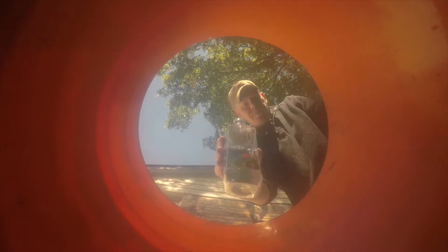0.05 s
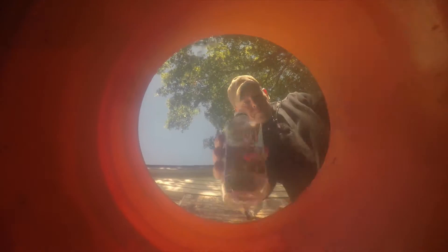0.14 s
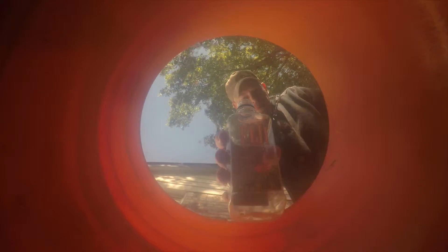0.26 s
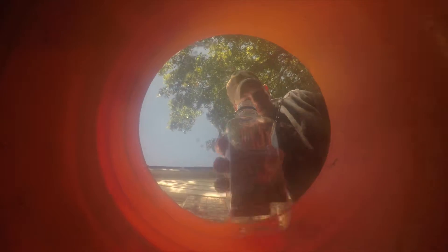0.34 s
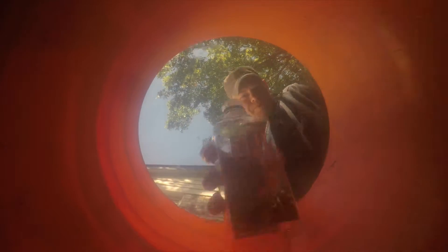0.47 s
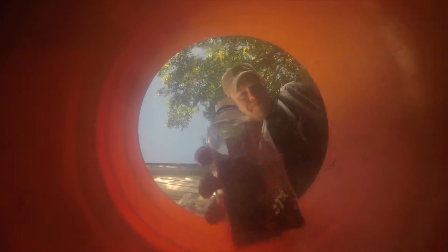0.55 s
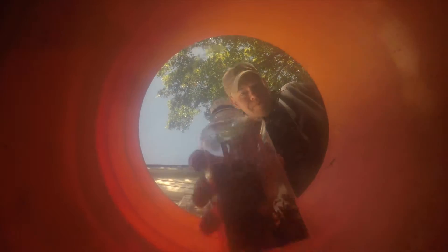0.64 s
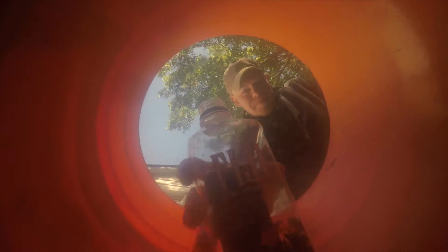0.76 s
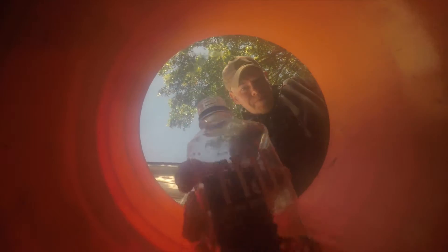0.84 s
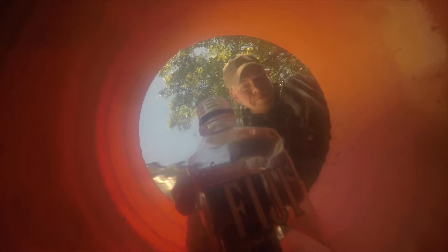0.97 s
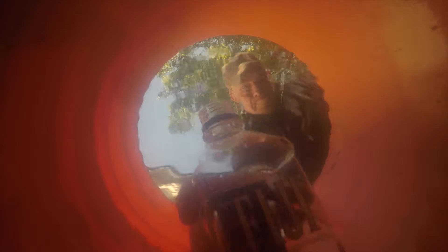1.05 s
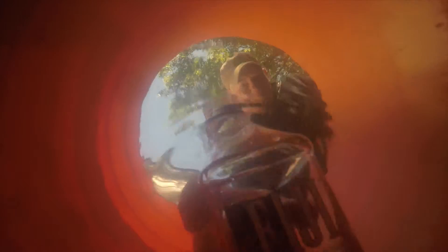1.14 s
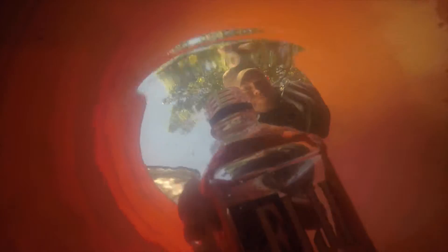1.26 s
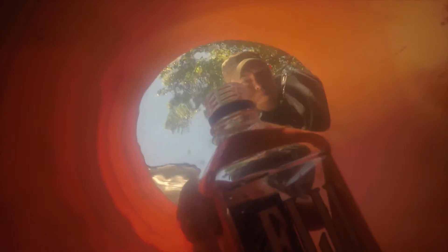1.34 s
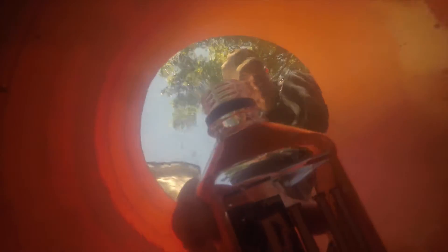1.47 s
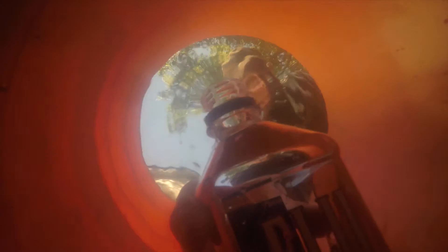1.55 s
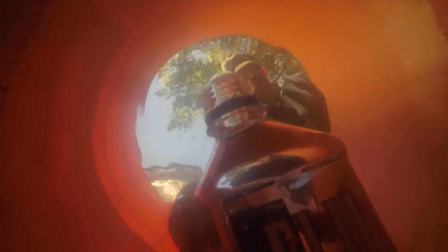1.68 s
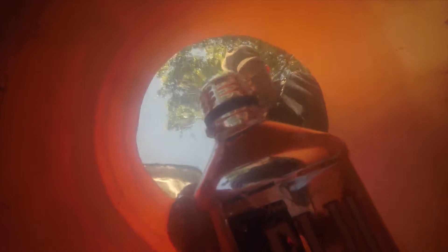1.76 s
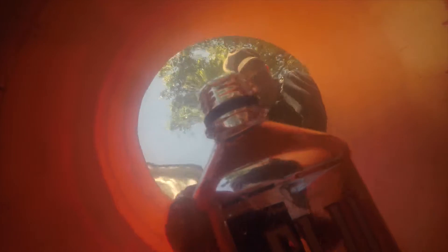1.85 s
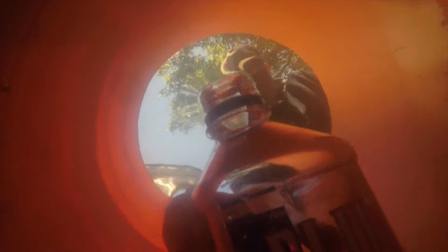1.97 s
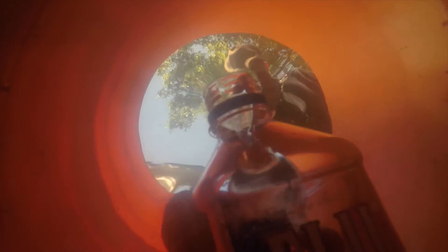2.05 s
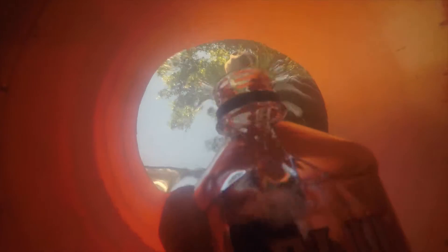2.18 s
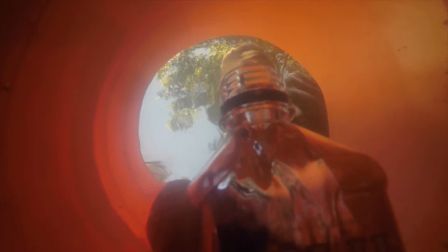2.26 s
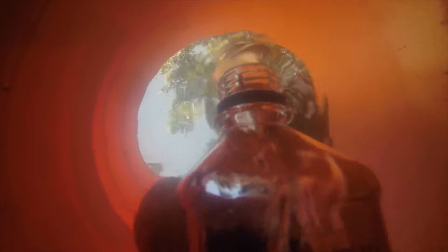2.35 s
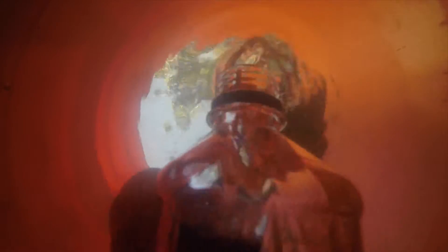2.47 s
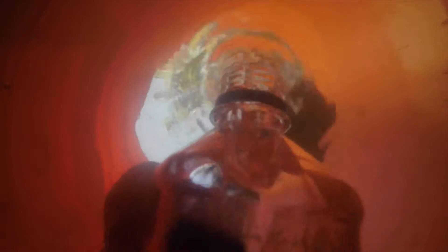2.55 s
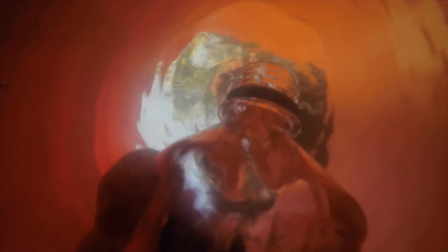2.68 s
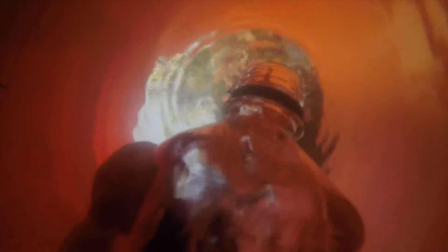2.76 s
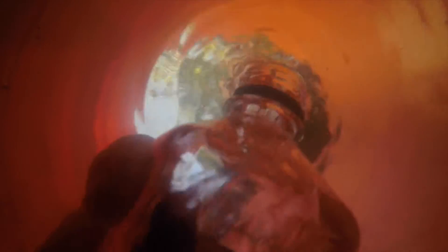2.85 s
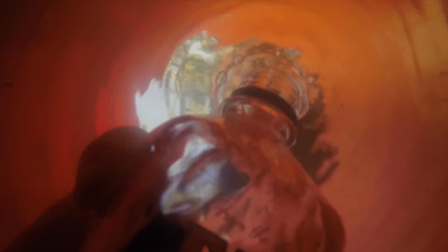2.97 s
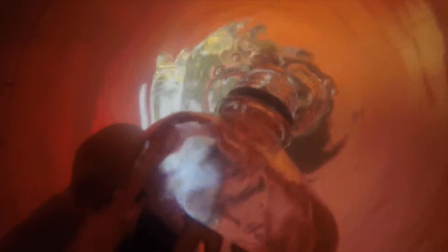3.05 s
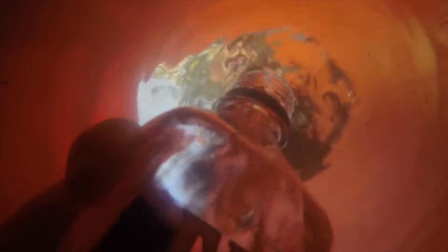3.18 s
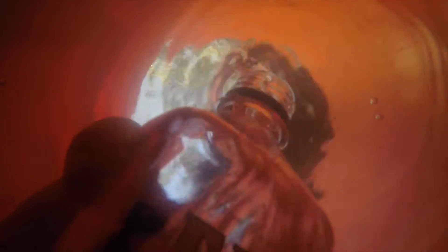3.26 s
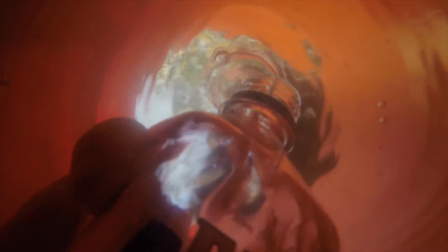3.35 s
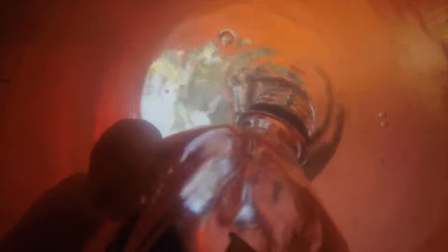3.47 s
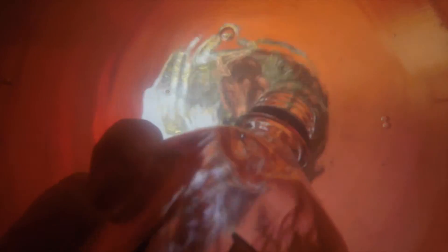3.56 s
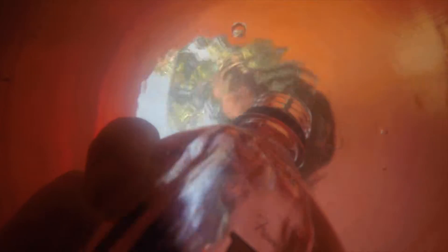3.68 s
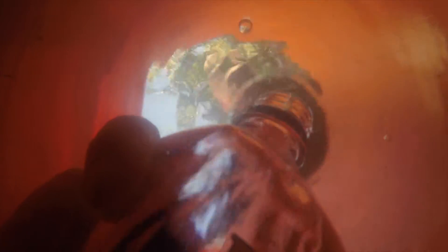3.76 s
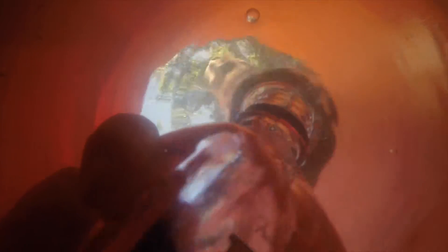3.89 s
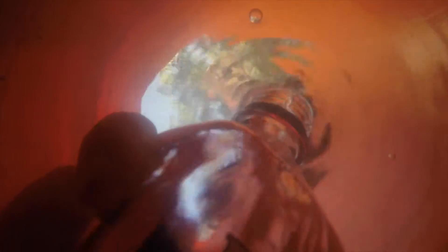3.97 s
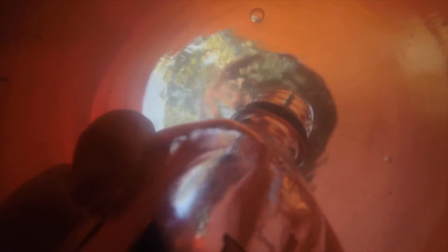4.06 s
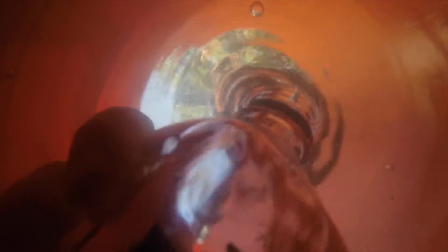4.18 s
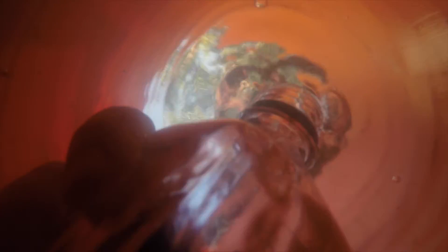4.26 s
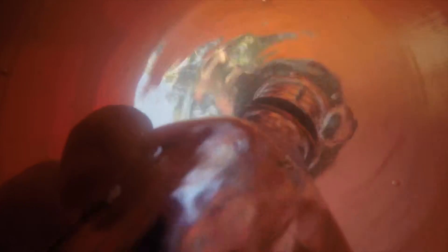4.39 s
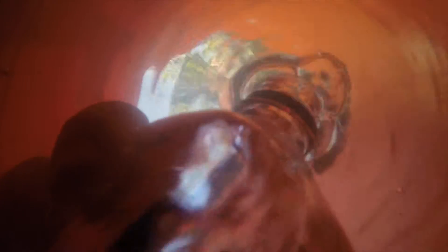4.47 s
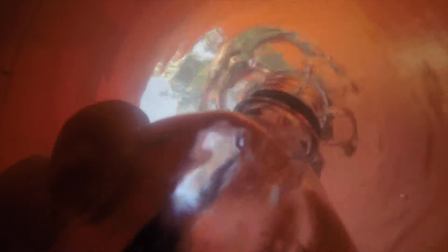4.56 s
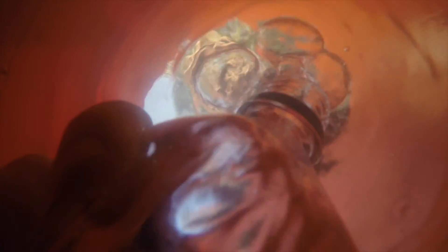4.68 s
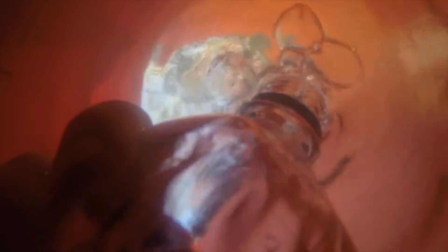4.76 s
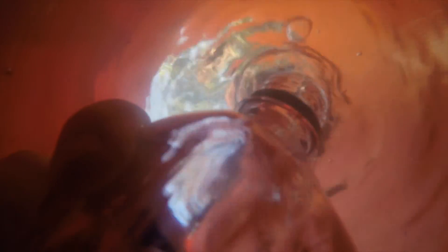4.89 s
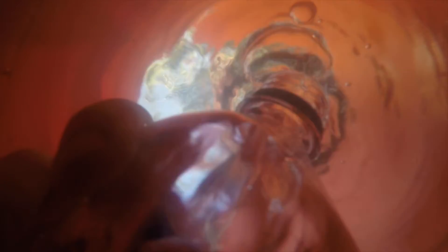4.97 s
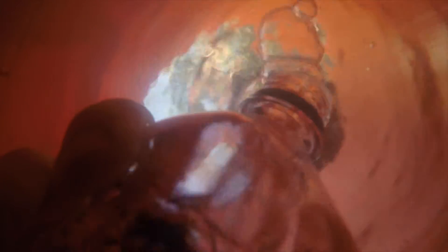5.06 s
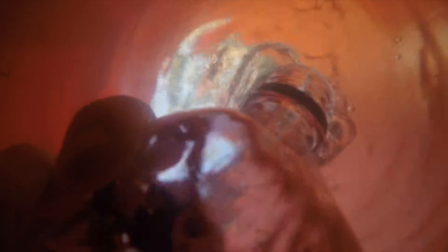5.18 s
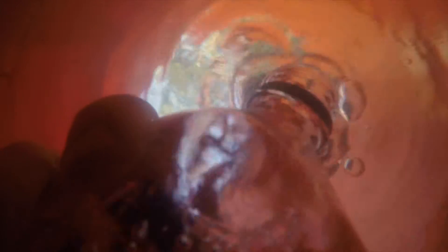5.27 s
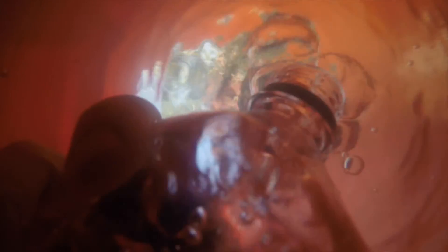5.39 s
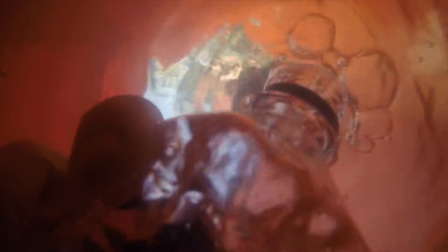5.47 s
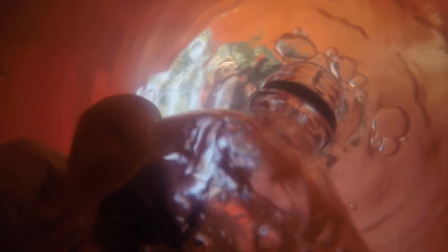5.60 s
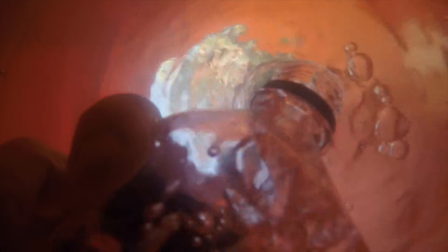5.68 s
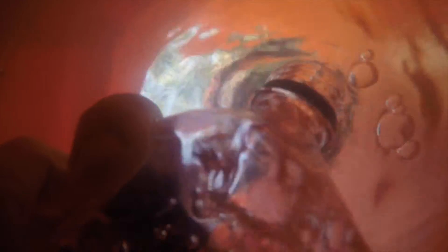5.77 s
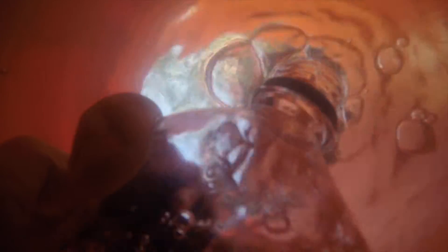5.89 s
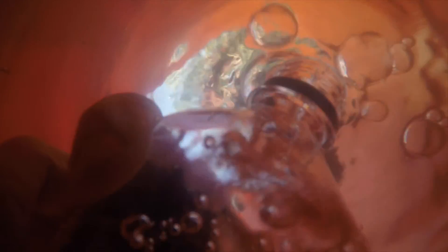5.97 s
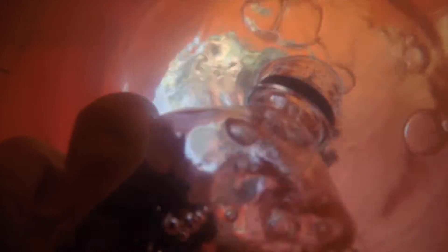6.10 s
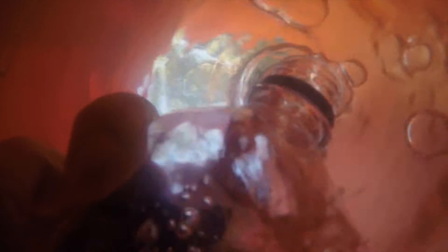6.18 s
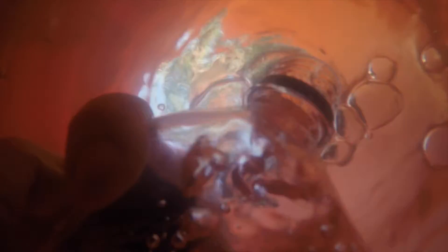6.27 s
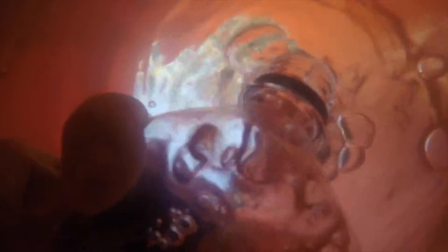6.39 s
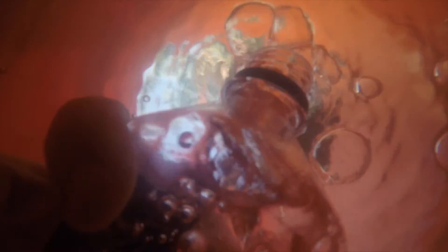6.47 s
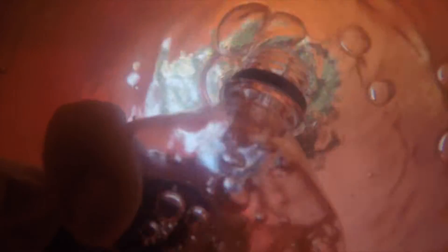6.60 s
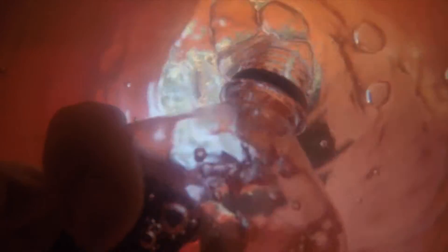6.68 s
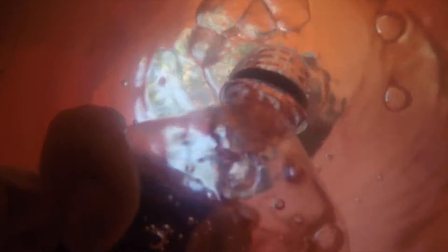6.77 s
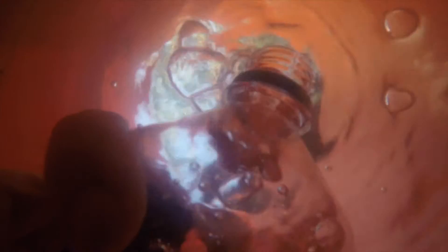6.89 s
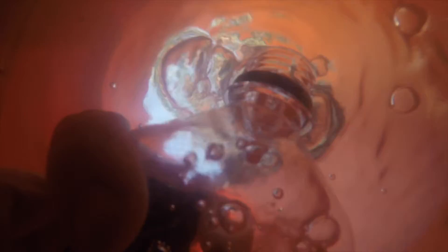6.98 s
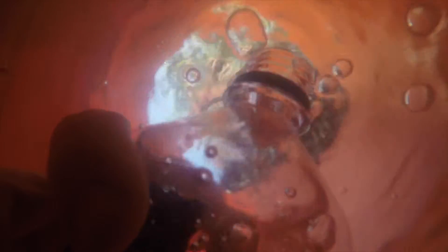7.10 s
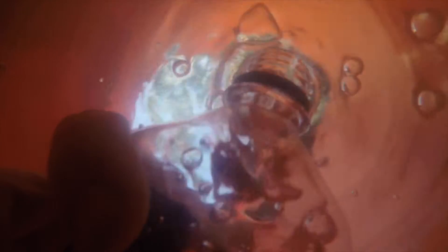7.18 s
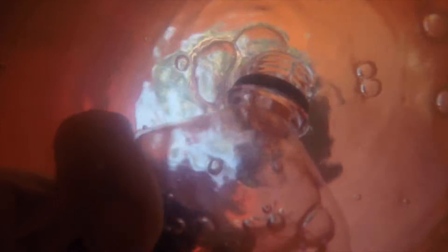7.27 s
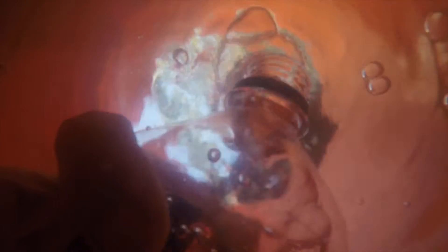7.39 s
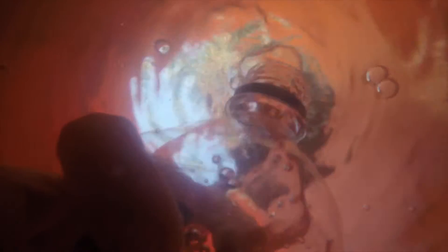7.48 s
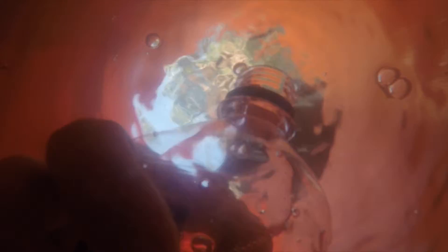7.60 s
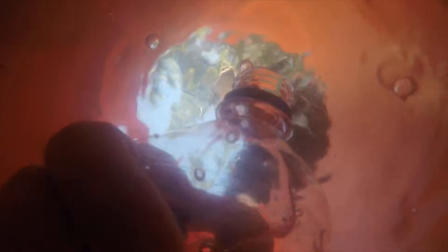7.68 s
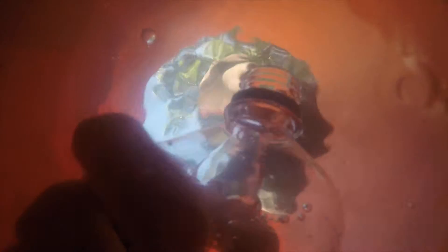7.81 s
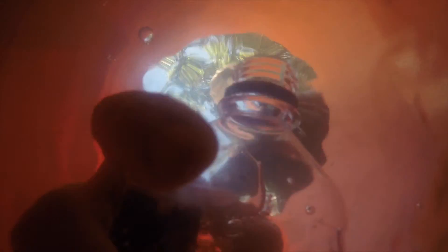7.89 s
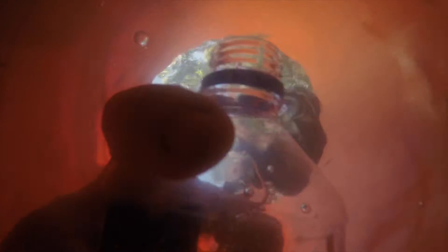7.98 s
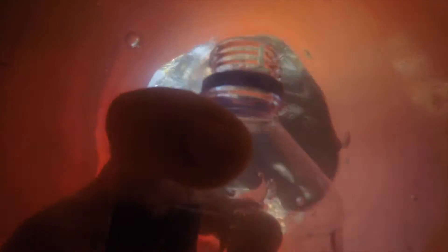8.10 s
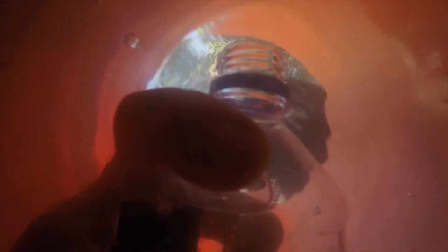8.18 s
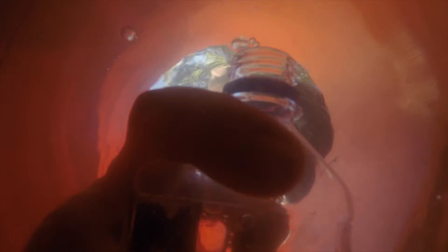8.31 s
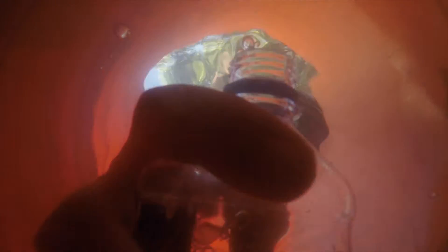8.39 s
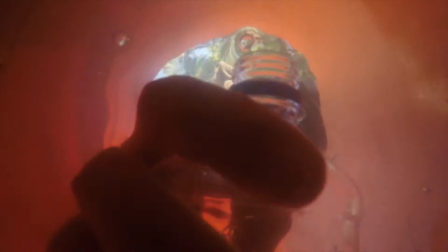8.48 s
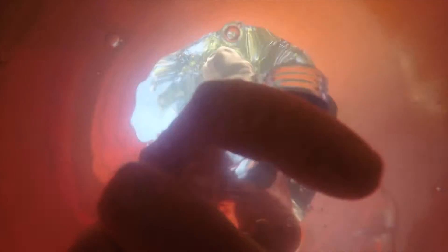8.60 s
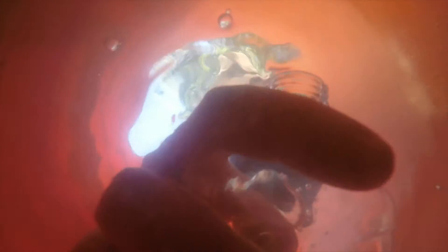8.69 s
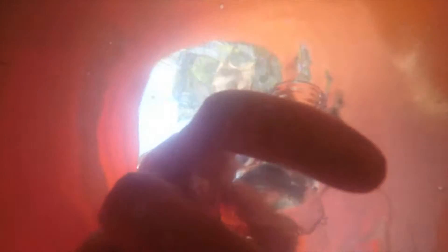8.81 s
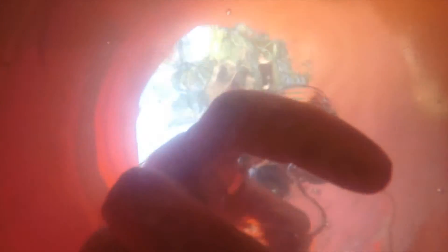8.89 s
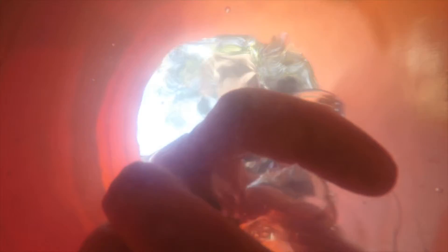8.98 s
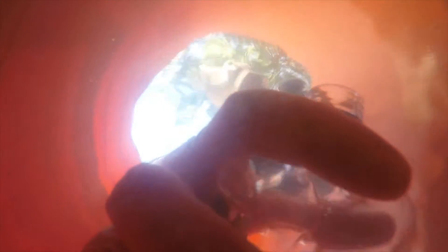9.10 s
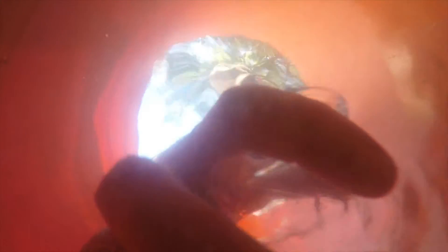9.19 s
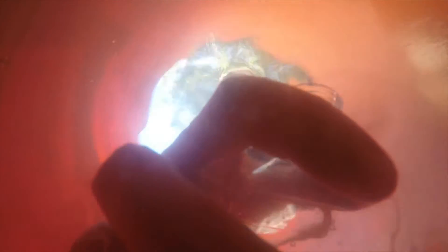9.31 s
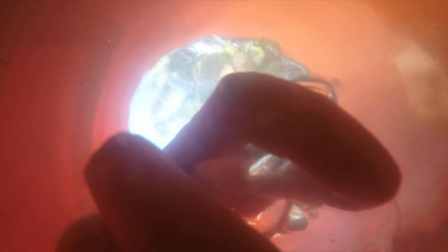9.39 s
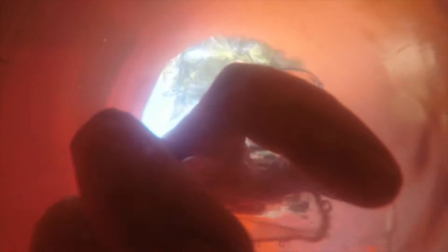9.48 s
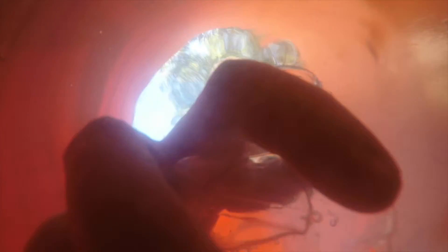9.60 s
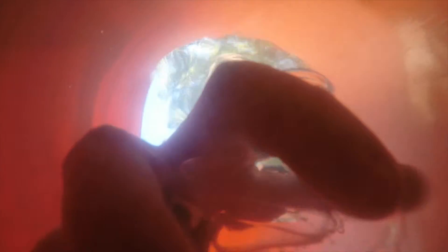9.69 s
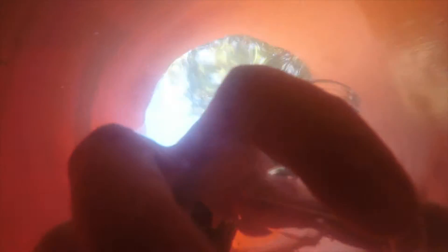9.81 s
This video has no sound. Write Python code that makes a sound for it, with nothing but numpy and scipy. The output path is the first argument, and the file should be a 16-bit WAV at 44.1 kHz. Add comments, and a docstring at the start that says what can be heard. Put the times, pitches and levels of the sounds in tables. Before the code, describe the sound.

Heard close and underwater: dull distant waves, a short cluster of bottle taps on plastic, and a little hiss. Then continuous irregular booming gulps of air leave the bottle neck, crowded with bright pops, rising plops, fine ticks and fizz. After about seven seconds the gulping stops; water sloshes low, hisses briefly, and the bottle thumps the bucket wall several times, hardest near nine seconds.

```python
"""Muffled surf comes first, heard through bucket and water: shaped noise with two faint steady tones.
A bottle then taps the wall of the water-filled bucket, rocks it and stirs the water: ringing modes and swells.
Pushed under, it glugs: short booms, with bubble pings, plops, fizz, fine ticks and hissing rushes of water.
Near the end the bottle knocks on the wall again. Bubbles and hiss also ring the plastic case round the
microphone, which lies on the bottom; the loudest peaks are softly overloaded."""
import sys
import numpy as np
from scipy import signal
from scipy.io import wavfile
from scipy.ndimage import uniform_filter1d

SR = 44100
rng = np.random.default_rng(int(sys.argv[2]) if len(sys.argv) > 2 else 0)


def store_wav(level_fs):
    """Save 16-bit WAV to argv[1]."""
    pcm = np.round(np.clip(np.atleast_2d(level_fs), -1, 1) * 32767)
    wavfile.write(sys.argv[1], SR, pcm.T.astype(np.int16))


N = 434385
TOP_HZ = SR / 2 - 2000  # highest starting pitch allowed for twin bubbles and ticks, and for snap bands

# Gulps of air leaving the bottle neck: start_s, level_db [dB], pitch_hz [Hz]
GULPS = [(2.308, -4.5, 84.5), (2.379, -12.5, 95.2), (2.454, -15, 82.3), (2.541, -10, 88.6),
         (2.592, -14, 84), (2.726, -12.5, 86), (2.82, -13.5, 89.4), (2.919, -14.5, 83.7), (2.968, -16, 92),
         (3.104, -10, 80), (3.158, -12, 92), (3.252, -14.5, 92.6), (3.348, -13, 85), (3.61, -8, 79.9),
         (3.668, -6, 86.6), (3.879, -16, 86.4), (3.963, -10.5, 83.9), (4.008, -10.5, 92.4),
         (4.225, -9, 83.2), (4.319, -13.5, 88), (4.431, -13.5, 79), (4.57, -10.5, 88), (4.641, -8.5, 79.5),
         (4.74, -10.5, 84.3), (4.896, -9.5, 85.9), (5.013, -12.5, 92), (5.121, -7.5, 86.3),
         (5.269, -12.5, 83.8), (5.351, -13, 85), (5.429, -12, 85.3), (5.536, -10.5, 82.5), (5.58, -9, 86),
         (5.733, -14, 80.8), (5.82, -12, 66.4), (5.955, -14.5, 66.5), (6.015, -16, 87), (6.14, -11, 92.5),
         (6.356, -11.5, 91.8), (6.387, -18, 83.7), (6.451, -9.5, 81), (6.542, -11.5, 82),
         (6.588, -24, 82.4), (6.756, -11, 84.2), (6.882, -14, 79.4), (6.973, -16, 78), (7.14, -21, 92.3),
         (7.323, -21.5, 98.6)]
FILL_START_S, FILL_STOP_S = GULPS[0][0], GULPS[-1][0]  # the bottle fills from first to last gulp


def gain_of(db):
    """Turns decibels into amplitude."""
    return 10 ** (np.asarray(db) / 20)


def evened(x):
    """Scales a signal to an rms (average strength) of 1."""
    return x / np.sqrt(np.mean(x ** 2) + 1e-20)


def along(rows, axis=1):
    """Draws straight lines between the points of one table column, giving a value at every sample."""
    rows = np.array(rows)
    return np.interp(np.arange(N) / SR, rows[:, 0], rows[:, axis])


def add(mix, start_s, sound):
    """Mixes a sound in at a time, cutting off what runs past the end."""
    part = mix[round(start_s * SR):][:len(sound)]
    part += sound[:len(part)]


def band_noise(low_hz, high_hz, rows, length):
    """Rows of random noise filtered to one band of pitches."""
    band = signal.butter(2, [low_hz, high_hz], "band", fs=SR)
    return signal.lfilter(*band, rng.standard_normal((rows, length)))


def noise(shape, patchy_db, flicker_db, size=1024):
    """Noise from random short-time spectra, with drifting patches and a flicker shared by all pitches."""
    frames, hz = 4 * N // size + 5, np.fft.rfftfreq(size, 1 / SR)
    real, imaginary, patches = rng.standard_normal((frames, len(hz), 3)).T
    patches = uniform_filter1d(patches, size=9, axis=0)
    patches = evened(uniform_filter1d(patches, size=9, axis=1))
    flicker = evened(uniform_filter1d(rng.standard_normal(frames), size=3))
    shape_hz, shape_db = np.transpose(shape)
    level_db = np.interp(np.log(hz + 1), np.log(shape_hz + 1), shape_db)[:, None]
    level_db = level_db + patchy_db * patches + flicker_db * flicker
    spectra = (real + 1j * imaginary) * gain_of(level_db)
    sound = signal.istft(spectra, nperseg=size, noverlap=3 * size // 4)[1]
    return evened(sound[:N])


def resonate(x, modes):
    """Sum of steep resonances, each a one-pole filter applied twice."""
    out = np.zeros(len(x))
    for hz, width_hz, db in modes:
        pole = np.exp((2j * hz - width_hz) * np.pi / SR)
        twice = np.convolve([1, -pole], [1, -pole])
        out += gain_of(db) * evened(signal.lfilter([1], twice, x).real)
    return evened(out)


def ring(hz, t60_s, rise_s, glide=0.):
    """A soft-starting sine that dies by 60 dB in t60_s, its pitch climbing by the share glide in that time."""
    t = np.arange(int(t60_s * SR) + 8) / SR
    shape = gain_of(-60 * t / t60_s) * (1 - np.exp(-t / rise_s))
    return shape / shape.max() * np.sin(2 * np.pi * hz * t * (1 + glide * t / t60_s / 2))


def surf():
    """Wave noise dulled by wall and water, plus faint steady tones from electronics."""
    # Spectrum of the muffled waves: pitch_hz [Hz], level_db [dB per Hz, relative]
    surf_spectrum = [(12, -29), (22, 9.5), (45, -18), (75, 2.5), (115, -15.5), (150, -7), (235, -16.5),
                     (300, -8), (430, -28.5), (700, -23.5), (796, -17), (1200, -30), (1510, -28.5),
                     (2600, -39), (3000, -43), (14500, -58.5)]
    # Loudness of the surf over time: time_s, level_db [dB]
    surf_level = [(0, -41), (1.06, -40), (1.3, -36), (2.2, -38), (3.3, -39), (7.5, -40.5), (9.85, -39)]
    # Tones from electronics: pitch_hz [Hz], level_db [dB rms]
    whine = [(7350, -84.5), (14700, -94)]
    t = np.arange(N) / SR
    tones = sum(gain_of(db) * np.sqrt(2) * np.sin(2 * np.pi * hz * t) for hz, db in whine)
    waves = noise(surf_spectrum, patchy_db=1.2, flicker_db=.2, size=8192)
    return gain_of(along(surf_level)) * waves + tones


def rocking(rest_hz=21.75):
    """The full bucket rocks on its base: a nearly pure, very low swing whose pitch drifts a little."""
    # Strength of the rocking over time: time_s, level_db [dB rms]
    rocking_level = [(1.07, -36.5), (2.03, -31.5), (2.1, -48), (2.54, -24.5), (3.76, -21.5), (4.18, -15.5),
                     (4.3, -21), (4.4, -18), (5.28, -22), (5.91, -16.5), (6.72, -21.5), (7.21, -13.5),
                     (8.06, -18), (8.38, -35.5), (8.53, -18.5), (8.92, -29), (9.07, -21), (9.85, -18)]
    fade_in = np.clip((np.arange(N) / SR - rocking_level[0][0]) / .02, 0, 1)
    drift = evened(uniform_filter1d(rng.standard_normal(N), size=12000))
    hz = rest_hz * (1 + 0.0387 * drift)
    swing = np.sqrt(2) * np.sin(2 * np.pi * np.cumsum(hz) / SR)
    return fade_in * gain_of(along(rocking_level)) * swing


def stirring():
    """Hand and bottle shove the water unevenly, exciting low resonances of bucket and water."""
    # Strength of the stirring over time: time_s, slosh_db [dB], gurgle_db [dB]
    stir_level = [(1.075, -39, -53), (1.33, -32.5, -51), (2.14, -37.5, -43), (2.5, -19.5, -46),
                  (4.32, -24, -49), (5.79, -22.5, -41.5), (6.91, -24, -43), (7.45, -30, -54.5),
                  (7.6, -44, -58.5), (8.06, -25.5, -45.5), (8.5, -29, -60), (8.7, -34.5, -36),
                  (8.88, -35.5, -56), (9.3, -30, -44.5), (9.6, -56, -46.5), (9.85, -28.5, -56)]
    # Lower resonances: pitch_hz [Hz], width_hz [Hz], level_db [dB, relative]
    slosh_modes = [(31, 8.2, -10.5), (48.44, 22, 0), (63.1, 14, -2.5), (90.9, 23.5, -1.5)]
    # Higher resonances: pitch_hz [Hz], width_hz [Hz], level_db [dB, relative]
    gurgle_modes = [(151.2, 65, 0.5), (209.8, 37, 0.5), (281.4, 72, -1.5), (375.6, 80, -5.5)]
    fade_in = np.clip((np.arange(N) / SR - stir_level[0][0]) / .01, 0, 1)
    unevenness_db = 3.5 * evened(uniform_filter1d(rng.standard_normal(N), size=1500))
    pushes = rng.standard_normal((2, N)) * gain_of(unevenness_db)
    slosh = gain_of(along(stir_level)) * resonate(pushes[0], slosh_modes)
    gurgle = gain_of(along(stir_level, axis=2)) * resonate(pushes[1], gurgle_modes)
    return fade_in * (slosh + gurgle)


def rushes():
    """Water rushing and fingers sliding: patchy hiss in spells that rise, hold and die away."""
    # Spells of hiss: start_s, rise_s, hold_s, level_db [dB], treble_db [dB above the rest]
    spells = [(1.137, 0.0055, .05, -45.5, 7), (1.178, 0.031, 0.046, -44.5, -3.5), (1.6, 0.44, .3, -50, -4),
              (2.25, 0.077, 0.17, -46, 5.5), (2.5, 0.027, 0.078, -47, 3.5), (2.578, 0.068, 0.094, -42, 4),
              (2.778, 0.042, 0.12, -39.5, -1), (2.944, 0.026, 0.11, -47, -6), (3.097, 0.28, 3.5, -57, -6.5),
              (6.328, 0.076, 0.15, -50.5, 4), (6.652, 0.13, 0.063, -52.5, 0),
              (7.595, 0.06, 0.009, -54, 4.5), (7.778, 0.032, 0.061, -45, 3.5),
              (7.877, 0.018, 0.055, -44, -0.5), (7.945, 0.015, 0.026, -42, 5), (8.336, 0.18, 0.034, -55, 5),
              (8.607, 0.062, 0.035, -47, -1.5), (8.853, 0.083, 0.15, -55, 2.5), (9.157, 0.13, 0.13, -55, 7),
              (9.285, 0.13, 0.053, -53, 5.5), (9.734, 0.12, 0.0083, -49.5, 4)]
    # Spectrum of the hiss: pitch_hz [Hz], level_db [dB per Hz, relative]
    hiss_spectrum = [(180, -49.5), (300, -1), (500, -16.5), (849, -7), (1970, -22.5), (2140, -16),
                     (2650, -23.5), (8560, -39), (14500, -44), (15500, -50)]
    edge_db, fall_db_per_s = -16.5, 260  # level where a rise begins, speed of dying away
    split_hz = 3500  # treble lies above this
    power, t = np.zeros((2, N)), np.arange(N) / SR
    for start_s, rise_s, hold_s, db, treble_db in spells:
        rise_db = edge_db * np.clip(1 - (t - start_s) / rise_s, 0, 1)
        fall_db = fall_db_per_s * np.maximum(t - start_s - rise_s - hold_s, 0)
        spell = (t > start_s) * gain_of(db + rise_db - fall_db) ** 2
        power += spell * gain_of([[0], [treble_db]]) ** 2
    hiss = noise(hiss_spectrum, patchy_db=3.0, flicker_db=1.0, size=256)
    low = signal.filtfilt(*signal.butter(2, split_hz, fs=SR), hiss)
    return np.sqrt(power[0]) * low + np.sqrt(power[1]) * (hiss - low)


def housing(x, ring_db):
    """The plastic case round the microphone adds its own ringing to a sound."""
    # Ringing of the case: pitch_hz [Hz], width_hz [Hz], level_db [dB, relative]
    case_modes = [(1260, 21, -5.5), (1666, 350, -3.5), (2624, 180, 0), (3300, 230, -5), (4330, 430, -2.5)]
    out = x.copy()
    for hz, width_hz, db in case_modes:
        out += gain_of(db + ring_db) * signal.lfilter(*signal.iirpeak(hz, hz / width_hz, SR), x)
    return out


def bucket(x):
    """Short dense reflections inside the bucket: a burst of noise dying by 60 dB in 29 ms."""
    t = np.arange(2600) / SR
    tail = rng.standard_normal(len(t)) * gain_of(-60 * t / 0.029) * (t > .001)
    return x + gain_of(-8) * signal.oaconvolve(x, tail / np.linalg.norm(tail))[:N]


def knocks():
    """Bottle blows ring the wall: long soft contacts wake mainly low modes, short hard ones crack more."""
    # Blows: start_s, level_db [dB], contact_ms [ms],
    # length [factor on each mode's ring time], boom_db [dB on the two lowest modes]
    blows = [(1.073, -7.5, 0.56, 0.43, 0.5), (1.089, -13.5, 0.72, 0.58, -16), (1.104, -16, 0.69, 0.51, 7),
             (1.137, -10.5, 10.4, 0.69, 3), (8.07, -2.5, 3.2, 0.7, -4.5), (8.091, -11.5, 2.9, 0.6, -2.5),
             (8.296, -5.5, 3.25, 0.85, 0.5), (8.609, -8.5, 2.3, 0.88, 1), (8.66, -9.5, 1.95, 0.72, 4),
             (8.721, -7, 4.8, 0.42, 3), (8.938, -4.5, 1.1, 1.05, -4), (8.949, 5, 1.49, 0.6, -10),
             (8.965, -4.5, 1.56, 1.07, -6.5), (8.983, -15.5, 3.1, 1.6, -3), (9.005, -9, 3.6, 0.76, -9.5),
             (9.222, -15, 2.3, 0.39, 4), (9.258, -14.5, 7.1, 1.2, 1), (9.33, -27, 2.6, 1.55, 8),
             (9.402, -15.5, 2.9, 0.79, -8)]
    # Ringing of the wall: pitch_hz [Hz], level_db [dB, relative], t60_s [s, before the blow's length factor]
    wall_modes = [(59.2, 3, 0.6), (85.7, 4.5, 0.23), (148.8, -4.5, 0.32), (204, -3, 0.24),
                  (286, -6.5, 0.17), (403, -7, 0.1), (471, -9, 0.059), (569, -8, 0.044), (703, -7, 0.077),
                  (837, -9, 0.061), (1130, -2, 0.044), (1380, -8.5, 0.022), (1700, -5.5, 0.016)]
    crack_db, crack_db_per_ms = -16, -17.5  # the longer the contact, the weaker the crack
    out, t = np.zeros(N), np.arange(900) / SR
    # where a blow lands shifts each mode's share and pitch
    spots = rng.standard_normal((len(blows), len(wall_modes), 2))
    cracks = band_noise(1500., 6000., len(blows), len(t))
    cracks = housing(cracks, ring_db=8.5) / 0.92
    for (start_s, db, contact_ms, length, boom_db), spot, crack in zip(blows, spots, cracks):
        fading_db = db + crack_db + crack_db_per_ms * contact_ms - 60 * t / 0.019
        add(out, start_s, gain_of(fading_db) * (1 - np.exp(-t / 0.0014)) * crack)
        for (hz, mode_db, t60_s), (share, shift) in zip(wall_modes, spot):
            level = gain_of(db - 10.5 + mode_db + 1.5 * share + boom_db * (hz < 120))
            level /= 1 + (hz * contact_ms / 1000) ** 4  # long contact mutes high modes
            mode = ring(hz * (1 + 0.036 * shift), t60_s * length, rise_s=0.45 / hz + 0.0016)
            add(out, start_s, level * mode)
    return out


def ticks():
    """Finest ticks on the housing: tiny very high pings on wide dry clicks, lower in pitch later on."""
    # Ticks: start_s, level_db [dB]
    tick_list = [(2.8745, -33), (2.93, -46), (3.0827, -40), (3.103, -33), (3.1371, -50), (3.181, -46),
                 (3.2583, -36), (3.3042, -42), (3.4084, -42), (3.558, -34), (3.7293, -45), (3.755, -43),
                 (3.8021, -43), (4.168, -45), (4.2454, -41), (4.2665, -38), (4.5957, -49), (5.0168, -48),
                 (5.0397, -43), (5.1515, -49), (5.1957, -39), (5.299, -40), (5.3685, -52), (5.401, -34),
                 (5.4782, -41), (5.579, -50), (5.6224, -50), (5.6583, -44), (5.7032, -51), (5.791, -50),
                 (5.8649, -37), (6.0026, -43), (6.0693, -40), (6.262, -42), (6.2974, -42), (6.447, -37),
                 (6.872, -41), (6.9509, -40), (7.068, -38), (7.033, -52), (7.404, -42), (7.4892, -43)]
    # Middle pitch of the ticks over time: time_s, pitch_hz [Hz]
    tick_pitch = [(3.0, 14500), (5.1, 14100), (5.3, 12850), (7.1, 12600)]
    out, t = np.zeros(N), np.arange(200) / SR
    draws = rng.standard_normal((len(tick_list), len(t)))
    clicks = signal.lfilter(*signal.butter(2, [8500., 15000.], "band", fs=SR), draws)
    for (start_s, db), draw, click in zip(tick_list, draws, clicks):
        middle_hz = np.interp(start_s, *np.transpose(tick_pitch))
        hz = min(middle_hz * (1 + .015 * draw[0]), TOP_HZ)
        add(out, start_s, gain_of(db - 3.0) * ring(hz, t60_s=0.0034, rise_s=.0006))
        click_shape = gain_of(db - 1.0 - 60 * t / 0.0074) * (1 - np.exp(-t / .0004))
        add(out, start_s, click_shape * click)
    return out


def fizz(per_s=95.):
    """Many faint bubbles of all sizes while the bottle fills, each a rising ping with a small snap."""
    out, t = np.zeros(N), np.arange(200) / SR
    span_s = FILL_STOP_S - FILL_START_S
    draws = rng.random((int(per_s * span_s), 3))
    band = signal.butter(1, [900., 5000.], "band", fs=SR)
    snaps = signal.lfilter(*band, rng.standard_normal((len(draws), len(t))))
    for (when, size, loud), snap in zip(draws, snaps):
        start_s = FILL_START_S + when * span_s
        hz = 650 * (8000 / 650) ** size
        db = -53 - 3.9 * np.log(loud + 0.04)  # most are faint, a few stand out
        ping = ring(hz, 26 / hz + 0.002, rise_s=1.1 / hz, glide=0.49)
        add(out, start_s, gain_of(db - 3.1 * np.log2(hz / 1500)) * ping)
        add(out, start_s, gain_of(db - 3.5 - 60 * t / 0.01) * snap)
    return out


def plops(per_s=34):
    """Middling bubbles that slide up in pitch as they leave the neck, thicker as the bottle fills."""
    low_hz, high_hz, cycles = 200, 1100, 16  # range of starting pitch, length in swings of that pitch
    out, span_s = np.zeros(N), FILL_STOP_S - FILL_START_S
    for when, size, loud in rng.random((int(per_s * span_s), 3)):
        hz = low_hz * (high_hz / low_hz) ** (size ** 1.5)
        db = -43 - 2.6 * np.log(loud + 0.021) - 2.2 * np.log2(hz / low_hz)
        start_s = FILL_START_S + when ** .7 * span_s  # crowded towards the end
        add(out, start_s, gain_of(db) * ring(hz, cycles / hz, rise_s=1.9 / hz, glide=0.87))
    return out


def bubbles():
    """Bubbles ring at a pitch set by size, together with a dry snap; large ones start softly and climb most."""
    # Clearest bubbles, pinched off at the neck or popping on the housing:
    # start_s, level_db [dB], pitch_hz [Hz], t60_s [s to die by 60 dB]
    bubble_list = [(1.178, -33, 1220, 0.061), (1.18, -35, 3580, .006), (2.529, -33, 3930, .005),
                   (2.532, -32.5, 1800, .012), (2.86, -31, 844, 0.044), (2.998, -32.5, 1600, 0.015),
                   (2.605, -33.5, 2020, .028), (2.643, -33, 1170, 0.065), (2.719, -24.5, 635, 0.024),
                   (2.72, -22.5, 1200, 0.0035), (2.816, -33.5, 2570, 0.037), (2.873, -29.5, 405, .073),
                   (2.918, -30, 736, 0.024), (3.05, -28, 890, 0.018), (3.056, -15.5, 239, 0.028),
                   (3.079, -21.5, 1550, 0.0031), (3.103, -25, 1650, 0.0062), (3.2614, -39, 7500, 0.0065),
                   (3.28, -27, 3870, 0.0034), (3.317, -31.5, 2270, 0.012), (3.274, -39, 2680, 0.022),
                   (3.346, -31.5, 1016, 0.021), (3.355, -46, 3470, 0.016), (3.507, -41, 5200, .005),
                   (3.514, -36, 1520, .025), (3.4005, -29.5, 1900, 0.028), (3.4116, -26, 1460, 0.01),
                   (3.517, -32.5, 2020, 0.008), (3.5575, -27, 963, 0.025), (3.558, -21, 2420, 0.018),
                   (3.5995, -18.5, 1310, 0.0057), (3.627, -38.5, 2700, 0.019), (3.655, -24.5, 746, 0.016),
                   (3.693, -21, 795, 0.016), (3.71, -32, 2350, 0.0072), (3.803, -20.5, 950, 0.028),
                   (3.806, -20.5, 151, 0.038), (3.9207, -41, 4100, 0.0041), (3.969, -34.5, 1540, 0.031),
                   (4.0037, -30.5, 4230, 0.004), (4.075, -43, 4570, .012), (4.169, -24.5, 1490, 0.0029),
                   (4.2068, -36.5, 4540, 0.0084), (4.232, -35.5, 5170, 0.0059),
                   (4.2636, -31.5, 5900, 0.0032), (4.281, -30.5, 2520, 0.006), (4.2803, -26, 3920, 0.0048),
                   (4.297, -26, 193.6, 0.12), (4.35, -33, 766, 0.015), (4.3515, -21, 1710, 0.014),
                   (4.3514, -13, 2360, 0.015), (4.3973, -26, 1640, 0.0037), (4.497, -33.5, 1400, .025),
                   (4.527, -18.5, 1220, 0.0065), (4.5548, -19.5, 3250, 0.0021),
                   (4.597, -17.5, 5860, 0.0042), (4.601, -22, 830, 0.01), (4.6532, -17, 1510, 0.021),
                   (4.696, -29.5, 2260, 0.0085), (4.7265, -37, 2720, 0.032), (4.7503, -22, 1330, 0.012),
                   (4.757, -23, 4500, 0.013), (4.7572, -25.5, 2680, 0.0039), (4.8, -33, 7460, 0.0045),
                   (4.844, -34.5, 2180, .015), (4.897, -38, 780, 0.046), (4.9283, -36.5, 6560, .0048),
                   (4.995, -28.5, 3550, 0.0021), (5.023, -28.5, 2480, 0.0062), (5.041, -27, 2720, 0.0032),
                   (5.0664, -28, 1580, 0.009), (5.103, -29, 2230, 0.026), (5.114, -29, 3380, 0.0091),
                   (5.1194, -15, 1566, 0.0098), (5.1515, -15.5, 1390, 0.0014), (5.152, -22.5, 4870, 0.0047),
                   (5.178, -36, 4430, 0.0049), (5.2131, -19, 2190, 0.008), (5.228, -21, 2450, 0.014),
                   (5.26, -29.5, 2640, 0.006), (5.278, -33, 1445, 0.037), (5.2971, -21, 2580, 0.00061),
                   (5.3264, -38, 4240, 0.0094), (5.3776, -10, 1527, 0.013), (5.423, -35.5, 3040, 0.029),
                   (5.47, -40, 3350, .021), (5.476, -15.5, 680, 0.0076), (5.4784, -13, 1240, 0.012),
                   (5.4893, -17.5, 2980, 0.0025), (5.548, -21, 930, 0.022), (5.5625, -25.5, 2200, 0.01),
                   (5.58, -22, 2330, 0.034), (5.6152, -20, 1590, 0.011), (5.6393, -32, 6140, 0.004),
                   (5.7, -35, 694, 0.069), (5.7043, -15, 1650, 0.012), (5.704, -14, 3730, 0.0094),
                   (5.753, -24.5, 1460, 0.029), (5.7521, -23, 4320, 0.0088), (5.8569, -16, 3520, 0.011),
                   (5.865, -32, 764, 0.04), (5.9177, -6.5, 1530, 0.0033), (5.956, -28.5, 385, 0.051),
                   (6, -24.5, 844, 0.023), (6.07, -32, 2600, 0.0053), (6.0812, -23, 4600, 0.0057),
                   (6.221, -41, 4560, 0.005), (6.261, -32, 1020, 0.028), (6.262, -28, 1500, 0.028),
                   (6.264, -32.5, 3300, 0.012), (6.285, -31, 838, 0.036), (6.311, -12.5, 2080, 0.0098),
                   (6.352, -32, 720, 0.04), (6.3764, -33.5, 5710, 0.0045), (6.338, -32.5, 450, 0.037),
                   (6.385, -38, 4100, .008), (6.4476, -15.5, 1454, 0.043), (6.47, -28, 728, 0.039),
                   (6.567, -22.5, 3780, 0.0083), (6.569, -24, 2700, 0.0059), (6.678, -26, 6030, 0.0082),
                   (6.679, -37, 1700, 0.015), (6.682, -41, 3000, .03), (6.761, -37, 730, 0.036),
                   (6.778, -22, 4080, 0.0099), (6.854, -23, 233, 0.03), (6.88, -26, 4830, 0.0019),
                   (6.8879, -27.5, 2270, 0.032), (6.89, -22.5, 1330, 0.01), (6.9015, -31, 1340, 0.045),
                   (6.903, -25.5, 4340, 0.007), (6.9522, -29, 7600, 0.0011), (7.0677, -18, 5940, 0.0035),
                   (7.069, -34.5, 1290, 0.035), (7.138, -37, 795, 0.046), (7.168, -46, 4870, 0.005),
                   (7.2196, -12.5, 1550, 0.036), (7.254, -41, 3270, 0.0055), (7.231, -14, 162, 0.025),
                   (7.33, -35, 820, 0.024), (7.326, -23.5, 233, 0.096), (7.436, -29.5, 226, 0.094),
                   (7.819, -24, 267, 0.035), (7.856, -30, 267, 0.082), (7.855, -38, 704, 0.053),
                   (7.9254, -26, 7270, 0.011), (7.931, -22, 149, 0.059), (7.945, -33, 1290, .03),
                   (7.949, -27.5, 1350, 0.05), (8.956, -35, 9400, 0.0059), (8.958, -38, 7400, .005)]
    out, t = np.zeros(N), np.arange(700) / SR
    draws = rng.standard_normal((len(bubble_list), len(t) + 1))
    for (start_s, db, hz, t60_s), draw in zip(bubble_list, draws):
        rise_s = 0.15 / hz + (t60_s / 5 if hz < 1100 else 0)
        glide = (250 + 120 * draw[3]) / (hz + 600)
        add(out, start_s, gain_of(db - 3.0) * ring(hz, t60_s, rise_s, glide))
        # a neighbour torn off in the same pinch
        twin_hz = min(hz * (1 + 0.3 * np.tanh(draw[1])), TOP_HZ)
        twin_s = start_s + 3 / hz * abs(draw[2])
        add(out, twin_s, gain_of(db - 14) * ring(twin_hz, .7 * t60_s, rise_s=.3 / hz))
        # the snap spans an octave either side of the pitch, up to TOP_HZ
        band = signal.butter(1, [hz / 2, min(2 * hz, TOP_HZ)], "band", fs=SR)
        snap = evened(signal.lfilter(*band, draw[1:])) * (1 - np.exp(-t * hz / 2.3))
        snap_t60_s = 0.001 + 0.32 * min(t60_s, .03)
        add(out, start_s, gain_of(db - 32 - 60 * t / snap_t60_s) * snap)
    return out


def blops():
    """Each gulp rises as one big bubble that wobbles low a moment later, louder as the bottle fills."""
    growth_db_per_s = 4.5
    out = np.zeros(N)
    for (start_s, db, _), (lag, size, loud) in zip(GULPS, rng.standard_normal((len(GULPS), 3))):
        level_db = 0.35 * db - 39.5 + growth_db_per_s * (start_s - FILL_START_S) + 3.0 * loud
        wobble = ring(147 * (1 + 0.041 * abs(size)), t60_s=0.087, rise_s=0.0011, glide=0.3)
        add(out, start_s + .015 * abs(lag), gain_of(level_db) * wobble)
    return out


def glugs():
    """Each gulp leaving the neck rings the bottle's air in a short boom, with a lump of churned water."""
    out, t = np.zeros(N), np.arange(4000) / SR
    churn = evened(band_noise(130., 420., len(GULPS), len(t)))
    for (start_s, db, hz), lump in zip(GULPS, churn):
        add(out, start_s, gain_of(db) * ring(hz, 0.34, rise_s=0.0029, glide=0.14))
        lump_shape = gain_of(db - 31.0 - 60 * t / 0.11) * (1 - np.exp(-t / 0.0012))
        add(out, start_s, lump_shape * lump)
    return out


def scene():
    """All sources at the one microphone."""
    in_bucket = bucket(bubbles() + blops() + plops() + fizz())
    bright = housing(in_bucket + ticks(), ring_db=-0.5) + housing(rushes(), ring_db=6)
    return (surf() + rocking() + stirring() + glugs() + bright + knocks())[None]


def record(dry):
    """Rounds off the loudest peaks, then removes everything above edge_hz."""
    edge_hz = 15660
    soft = 1.596 * np.tanh(dry / 1.21)
    low_pass = signal.firwin(2047, edge_hz, window=("kaiser", 9), fs=SR)
    return signal.oaconvolve(soft, low_pass[None], "same")


dry = scene()
out = record(dry)
store_wav(out)
```